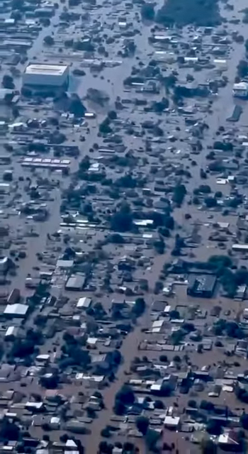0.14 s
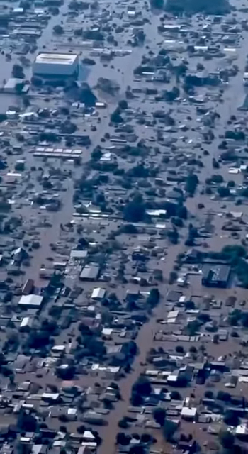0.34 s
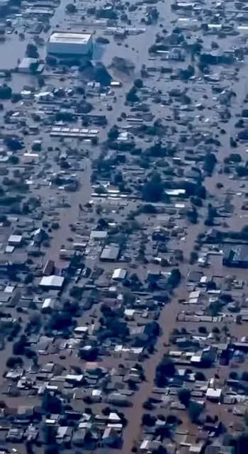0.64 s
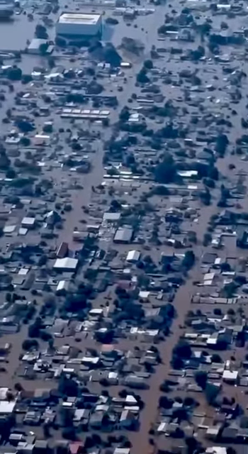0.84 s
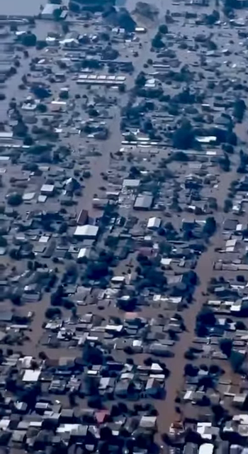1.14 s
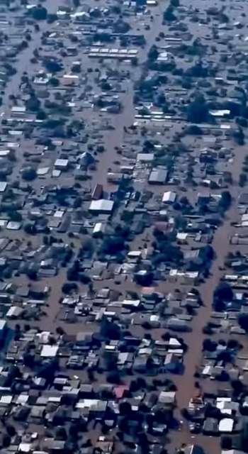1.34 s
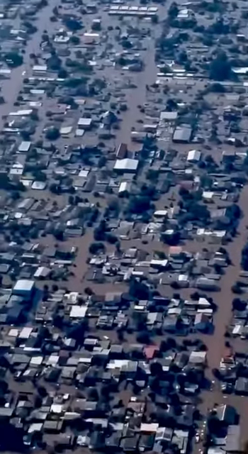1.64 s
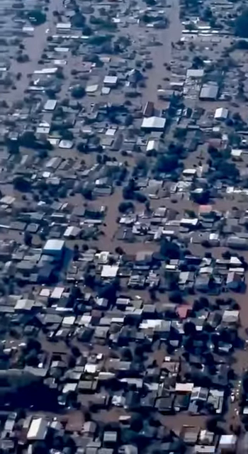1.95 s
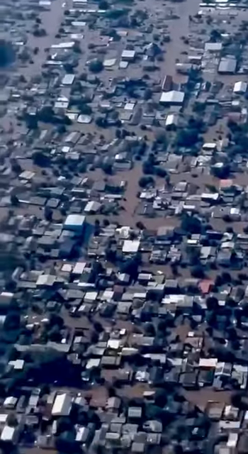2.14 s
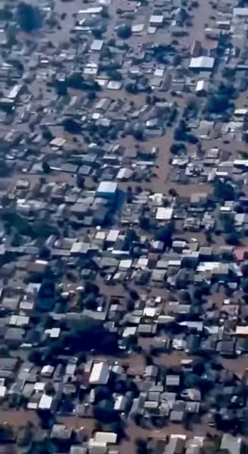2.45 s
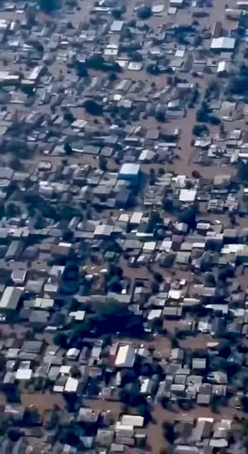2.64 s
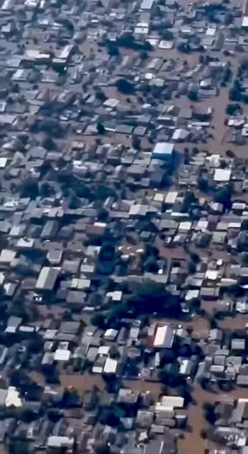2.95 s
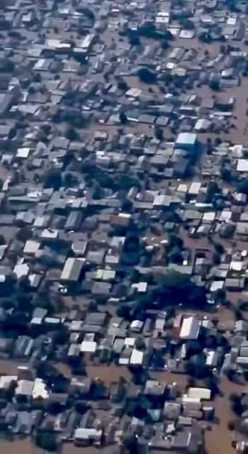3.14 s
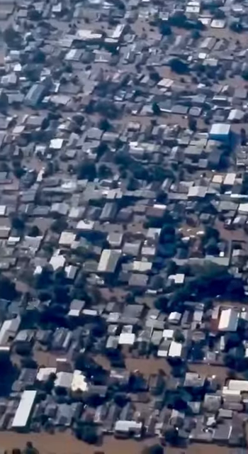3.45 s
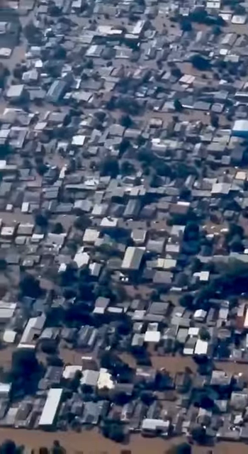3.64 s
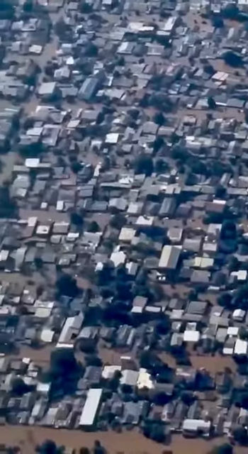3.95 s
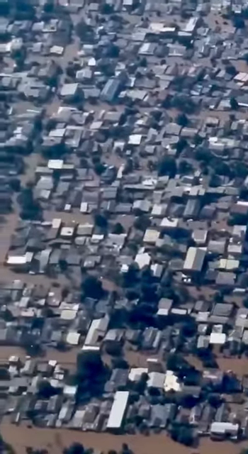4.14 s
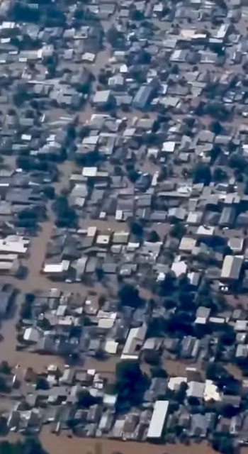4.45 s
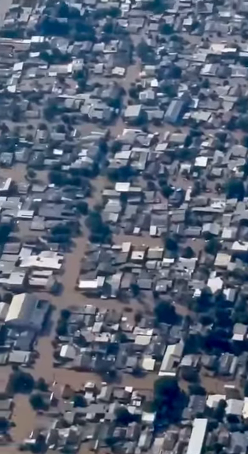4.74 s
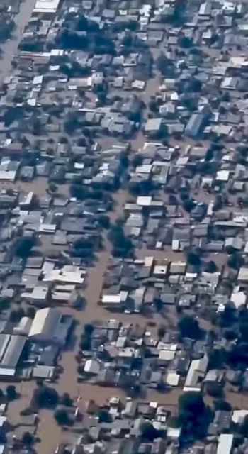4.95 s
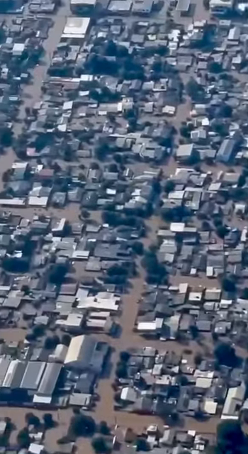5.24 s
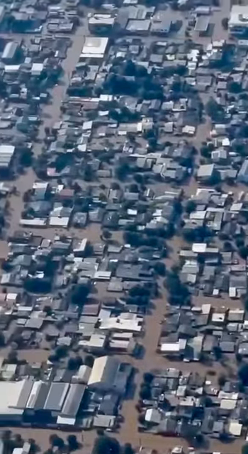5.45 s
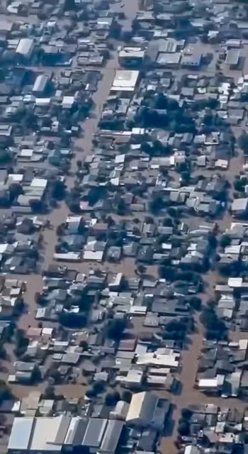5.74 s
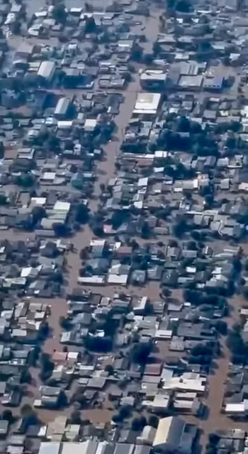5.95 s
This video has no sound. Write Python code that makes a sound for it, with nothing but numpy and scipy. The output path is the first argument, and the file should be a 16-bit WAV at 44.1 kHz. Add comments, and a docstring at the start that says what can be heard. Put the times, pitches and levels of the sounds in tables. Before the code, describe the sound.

Inside a small flying plane, buffeting wind rush over a deep propeller hum; the roar cuts away for a moment and returns.

```python
"""Slipstream roars over the two microphone ports inside a light aircraft in flight: patchy coloured noise. The
roar drops out for a moment and comes back from its top end down, its lower edge sinking. Under it lie the
propeller's hum (two sines), the cabin's drone and a thin air hiss (coloured noises), with a very faint,
drifting narrow line near 10.85 kHz within the hiss. The noises reach left and right partly alike: the housing
shifts the bass in phase, while in some treble bands left and right stand opposed."""
import sys
import numpy as np
from scipy import signal
from scipy.fft import rfft, irfft, next_fast_len
from scipy.io import wavfile
from scipy.ndimage import uniform_filter1d, map_coordinates

SR = 44100
rng = np.random.default_rng(int(sys.argv[2]) if len(sys.argv) > 2 else 0)


def unload_audio(sound):
    """Save the sound as a 16-bit wav file, at the path given as the first command line argument."""
    columns = np.transpose(np.atleast_2d(sound))
    # keep every value between -1 and 1, then stretch to whole-number steps
    steps = np.round(np.clip(columns, -1, 1) * 32767)
    wavfile.write(sys.argv[1], SR, steps.astype(np.int16))


N = 268563

DROP_S, CUT_S = 4.62, .055  # the roar's dropout: start, time to fall
BACK_S = 5.475  # the roar's return


def amp(db):
    """Gain of a level in dB."""
    return 10 ** (np.asarray(db) / 20)


def unit(x):
    """x at rms 1."""
    return x / np.sqrt(np.mean(x ** 2) + 1e-20)


def ramp(t, start_s, length_s):
    """0 before the start, rising evenly to 1 after the length."""
    return np.clip((t - start_s) / length_s, 0, 1)


def along(points, hz):
    """Each column after the frequency, read at hz on a log axis."""
    point_hz, *columns = np.transpose(points)
    return [np.interp(np.log(hz + 1), np.log(point_hz + 1), column) for column in columns]


def curves(rows):
    """Each column after the time, at every sample."""
    row_s, *columns = np.transpose(rows)
    return [np.interp(np.arange(N) / SR, row_s, column) for column in columns]


def wobble(rate):
    """A smooth random curve, rate knots a second."""
    knots = rng.standard_normal(int(N * rate / SR) + 4)
    return map_coordinates(knots, [np.arange(N) * rate / SR])


def filtered(x, response):
    """x through a complex response of frequency."""
    size = next_fast_len(N + 8192)
    spectrum = rfft(x, size) * response(np.fft.rfftfreq(size, 1 / SR))
    return irfft(spectrum, size)[..., :N]


def rush(colour, patchy_db, size=8, count=5):
    """Two unrelated coloured noises, rms 1 together, sharing random gain patches of size bins by count frames."""
    z = signal.stft(rng.standard_normal((2, N)), nperseg=1024)[2]
    patches = uniform_filter1d(rng.standard_normal(z.shape[1:]), size=size, axis=0)
    patches = uniform_filter1d(patches, size=count, axis=1)
    pair = signal.istft(z * amp(patchy_db * unit(patches)), nperseg=1024)[1][:, :N]
    return unit(filtered(pair, lambda hz: amp(along(colour, hz)[0])))


def shaped_roar():
    """Turbulent noise, its lower edge raised in the dropout, then sinking; it darkens from the return on."""
    # slipstream spectrum before edge and tilt: frequency_hz, relative density_db (per Hz)
    roar_colour = [(18, -65.5), (60, -12), (124, -9.5), (200, -5), (314, -2), (370, 0.5), (480, -2.5),
                   (644, -7.5), (850, -20.5), (1000, -28.5), (1150, -38), (1800, -56), (2340, -76),
                   (3960, -120)]
    # slipstream level before edge, tilt, dropout and drift: time_s, level_db
    roar_levels = [(0, -19.5), (.04, -16), (.35, -17.5), (.55, -14.5), (.75, -16), (1.0, -13.5),
                   (1.15, -16), (1.3, -16), (1.7, -18), (2.3, -17.5), (3.3, -18.5), (3.7, -17.5),
                   (4.1, -19.5), (4.3, -18), (4.61, -18.5), (5.6, -21.5), (6.09, -16)]
    steady_edge_hz, steady_tilt_db_per_oct = 86, 1.3
    drop_db = -26
    onset_s, back_db, swell_s = .025, -2, .17  # the return: first jump, level after it, time to full
    back_edge_hz, edge_fall_oct_per_s = 590, 5.2  # the edge sinks from here
    lowest_edge_hz, back_top_hz = 125, 820  # the later roar stays roughly between these
    darken_db_per_oct, darken_s = -3.2, .4
    edge_peak_db = 5  # just above the raised edge, fading as the roar darkens

    hz, t, z = signal.stft(rush(roar_colour, patchy_db=1.03), SR, nperseg=2048)
    hz = hz[:, None]
    after_cut = t > DROP_S + CUT_S
    darkening = ramp(t, BACK_S, darken_s)

    sinking_s = np.clip(t - BACK_S - onset_s, 0, None)
    sinking_hz = back_edge_hz * 2 ** (-edge_fall_oct_per_s * sinking_s)
    edge_hz = np.where(after_cut, np.maximum(sinking_hz, lowest_edge_hz), steady_edge_hz)
    raised = edge_hz > steady_edge_hz
    edge = (hz / edge_hz) ** np.where(raised, 8, 5)  # steeper from the dropout on
    low_cut = edge / np.sqrt(1 + edge ** 2)

    tilt_db_per_oct = steady_tilt_db_per_oct + darken_db_per_oct * darkening
    tilt = amp(tilt_db_per_oct * np.log2((hz + 50) / 400))
    high_cut = 1 / np.sqrt(1 + after_cut * (hz / back_top_hz) ** 8)

    bump = np.exp(-np.log2((hz + 1) / edge_hz / 1.15) ** 2 / .08)
    peak = amp(edge_peak_db * raised * (1 - darkening) * bump)
    roar = signal.istft(z * tilt * high_cut * peak * low_cut, SR, nperseg=2048)[1][:, :N]

    # times: fall starts, fall ends, return starts, first jump ends, full again
    turns_s = np.cumsum([DROP_S, CUT_S, BACK_S - DROP_S - CUT_S, onset_s, swell_s])
    dropout_db = np.interp(np.arange(N) / SR, turns_s, [0, drop_db, drop_db, back_db, 0])
    return roar * amp(curves(roar_levels)[0] + dropout_db + .7 * wobble(9))


def slipstream():
    """Turbulence over the ports: the roar, whose strongest buffets throw off brighter flutter."""
    # sharpest buffets, added to the flutter: start_s, peak level_db
    buffets = [(0.076, -38), (0.128, -43.5), (.514, -42.5), (.546, -45), (.697, -41), (.789, -36),
               (.838, -45), (.893, -42.5), (.915, -44), (.938, -44), (.967, -42), (1.015, -44),
               (1.061, -39.5), (1.142, -40.5), (1.216, -38.5), (1.239, -46.5), (1.428, -39), (2.068, -42.5),
               (2.145, -43.5)]
    buffet_rise_s = .0026
    flutter_db, flutter_fade_db_per_s = -23.5, -1  # gain on the roar's raised envelope

    roar = shaped_roar()
    t = np.arange(N) / SR
    envelope = np.abs(signal.hilbert(roar[0], next_fast_len(N))[:N])
    flutter_colour = [(700, -40.5), (1200, -1.0), (1700, -9.0), (2300, -15.5), (4000, -46.0)]  # Hz, dB
    flutter = rush(flutter_colour, patchy_db=1.5)

    puffs = np.zeros(N)
    for start_s, peak_db in buffets:
        age = np.clip(t - start_s, 0, None) / buffet_rise_s
        puffs += amp(peak_db) * age * np.exp(1 - age)  # peaks one rise time after the start

    # the power above 1 favours the strongest buffets
    flutter_gain = amp(flutter_db + flutter_fade_db_per_s * t) * envelope ** 3.07
    return roar + (flutter_gain + puffs) * flutter


def propeller():
    """Passing blades make a slightly unsteady tone with a weak second order."""
    # blade tone, first order before its random drift: time_s, level_db
    hum_levels = [(0, -51), (.3, -37), (.75, -40), (.95, -31.5), (2.15, -30.5), (2.4, -33), (2.65, -31),
                  (2.85, -40.5), (3.0, -35), (3.4, -42.5), (3.7, -40), (4.1, -39), (4.3, -42.5),
                  (4.55, -33.5), (4.72, -53), (4.95, -35.5), (5.25, -40.5), (5.5, -35.5), (5.7, -32),
                  (6.09, -30)]
    blade_hz = 100.1 + .3 * wobble(3)
    phase = 2 * np.pi * np.cumsum(blade_hz) / SR
    tone = np.sqrt(2) * (np.sin(phase) + amp(-15) * np.sin(2 * phase))
    return amp(curves(hum_levels)[0] + 1.6 * wobble(9)) * tone


def cabin():
    """Engine noise booming in the cabin's panels; the drone thins briefly in one band."""
    # drone spectrum: frequency_hz, relative density_db (per Hz)
    drone_colour = [(15, -69), (30, -20.5), (48, -11.5), (70, -2.5), (130, -9.5), (185, -5), (290, -8.5),
                    (365, 1), (450, -2), (550, -3.5), (680, -8.5), (800, -10), (1100, -20.5), (1500, -30.5),
                    (2200, -37), (4000, -77)]
    # drone level before the thinning: time_s, level_db
    drone_levels = [(0, -27.5), (2, -28), (4.6, -30), (4.75, -29.5), (5.1, -28.5), (5.3, -29.5),
                    (6.09, -30)]
    thin_s, thin_half_s, thin_hz, thin_db = 5.3, .13, 520, -5  # centre, half length, band, depth
    boom = rush(drone_colour, patchy_db=1.4, size=3, count=5)
    band = filtered(boom, lambda hz: np.exp(-np.log2((hz + 1) / thin_hz) ** 4 / .003))
    thin = np.exp(-((np.arange(N) / SR - thin_s) / thin_half_s) ** 4)
    return amp(curves(drone_levels)[0]) * (boom + (amp(thin_db * thin) - 1) * band)


def hiss():
    """Thin air hiss past the window seals: coloured noise with a very faint, drifting narrow line within."""
    # hiss spectrum: frequency_hz, relative density_db (per Hz)
    hiss_colour = [(1000, -21), (1700, 0), (2600, 0), (3100, 1.5), (3900, -3), (4400, -2.5), (5400, -5),
                   (7000, -7), (8300, -4.5), (9200, -10.5), (10100, -27), (10400, -1), (11000, -2.5),
                   (11150, -25), (11800, -29.5)]
    # hiss level, and part of the gain of its 9 to 10.1 kHz band: time_s, level_db, band_db
    hiss_levels = [(0, -52.5, 0.5), (1.3, -52.5, -2), (2.2, -53.5, -13), (3.8, -53, -7), (5.5, -53.5, -5),
                   (6.09, -51, -9)]
    band_step_db, band_return_s = 14, .36
    line_hz, line_db = 10853, -76.5  # centres of the random drift; peak level

    t = np.arange(N) / SR
    air = rush(hiss_colour, patchy_db=2.5, size=5, count=3)
    band = filtered(air, lambda hz: (hz >= 9000) & (hz < 10100))
    level_db, band_db = curves(hiss_levels)
    # gain of the 9 to 10.1 kHz band over time
    band_step = ramp(t, DROP_S, CUT_S) - ramp(t, BACK_S, band_return_s)
    band_db = band_db + band_step_db * band_step

    line = np.sin(2 * np.pi * np.cumsum(line_hz + 2.5 * wobble(4)) / SR)
    line = line * amp(line_db + 3 * wobble(3))
    # the line joins only the first of the two noises, which reaches both left and right
    return amp(level_db) * (air - band + amp(band_db) * band) + line * [[1], [0]]


def ports(pair):
    """Left and right, partly alike, from two unrelated noises: bass phase by the housing; in the treble some
    bands alike, some opposed, others spread."""
    # bass at the ports: frequency_hz, right_lead_rad, likeness_lost (0 to 1), left_minus_right_db
    bass_lead = [(90, .02, .002, 0), (170, .1, .02, 0), (340, .41, .04, .2), (520, .45, .065, .4),
                 (610, .43, .06, -.9), (700, .3, .075, -1.1), (860, .11, .04, -.6), (1000, .01, .012, -.1),
                 (1250, 0, .004, 0), (1450, 0, .012, 0), (1600, 0, 0, 0)]
    # stereo spread of the treble, some bands nearly alike left and right, others opposed:
    # frequency_hz, spread_rad (0 alike, minus pi opposed)
    treble_spread = [(1900, 0), (2550, -3.1), (2800, -3.0), (3750, -.3), (4500, -1.3), (5050, 0),
                     (5150, -.3), (5260, -np.pi), (6600, -np.pi), (7000, 0), (9650, 0), (10100, -np.pi),
                     (10800, -1.3), (11100, 0)]
    treble_blur = .55  # likeness lost in the treble halfway between alike and opposed

    def response(hz):
        bass, blur, lean_db = along(bass_lead, hz)
        treble, = along(treble_spread, hz)
        alike = 1 - blur - treble_blur * np.abs(np.sin(treble))
        turn = np.arccos(np.clip(alike, 0, 1)) / 2
        # each side takes half the angle and half the level difference
        rotation = np.exp(.5j * (bass + treble) * np.array([[-1], [1]]))
        placed = rotation * amp(.5 * lean_db * np.array([[1], [-1]]))
        return placed * np.cos(turn), placed * np.sin(turn) * [[1], [-1]]

    shared = filtered(pair[0], lambda hz: response(hz)[0])
    opposed = filtered(pair[1], lambda hz: response(hz)[1])
    return shared + opposed


def scene():
    """All the noise through the ports; the long waves of the hum reach both alike."""
    return ports(slipstream() + cabin() + hiss()) + propeller()


def record(dry):
    """Nothing is kept above the band limit."""
    top_hz = 11860
    return filtered(dry, lambda hz: hz < top_hz)


dry = scene()
out = record(dry)
unload_audio(out)
```